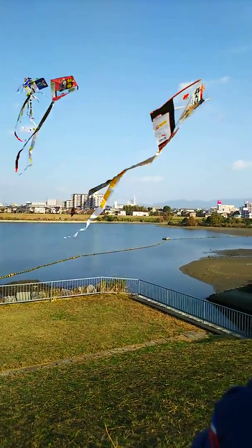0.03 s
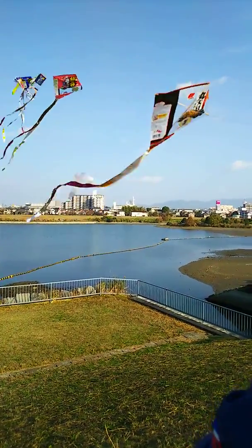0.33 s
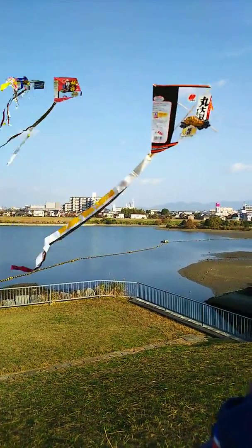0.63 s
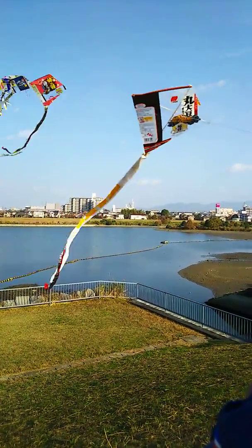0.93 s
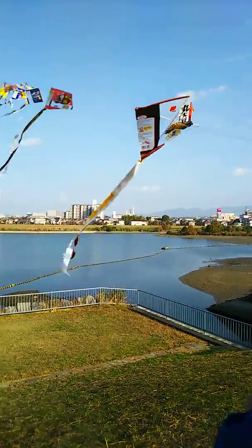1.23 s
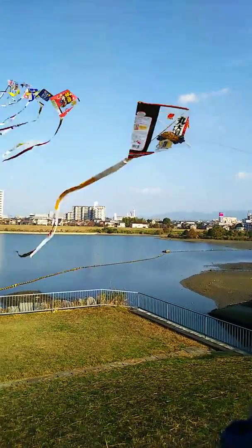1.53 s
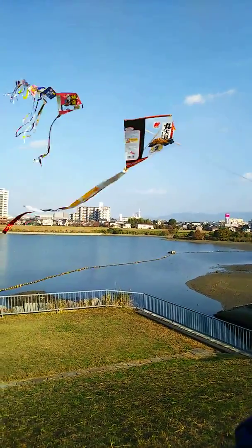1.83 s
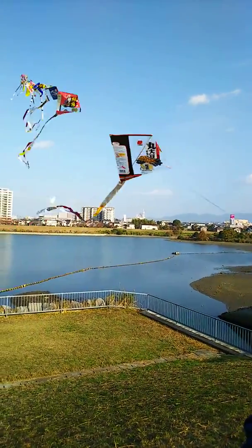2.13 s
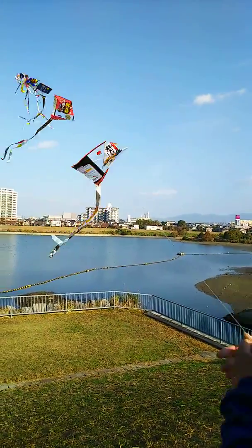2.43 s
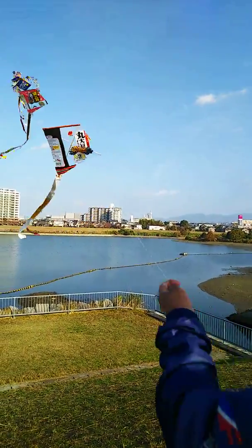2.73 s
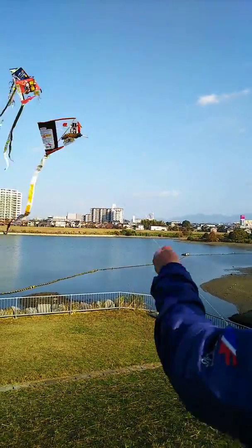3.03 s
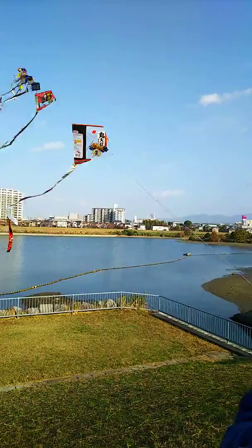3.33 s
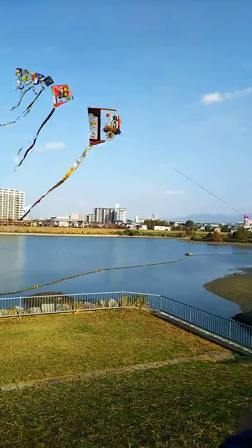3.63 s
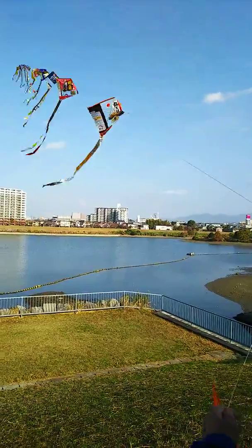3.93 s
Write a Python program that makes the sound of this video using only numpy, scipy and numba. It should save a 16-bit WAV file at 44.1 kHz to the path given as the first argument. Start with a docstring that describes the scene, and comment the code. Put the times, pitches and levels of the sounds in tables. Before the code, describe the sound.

Plastic kite tails flutter, crackle and snap a few metres away outdoors. Wind rumbles and thumps on the microphone, mostly on the left, over a faint town hum. Near the end, a jacket sleeve swishes close by.

```python
"""On the bank of a pond, plastic kites fly a few metres away. Their tails flutter in the airflow: the
buckling film crackles all the time, rustles in flurries and snaps when a wave whips off the end.
Turbulent wind buffets the two microphone ports, mostly the left, over the hum of a distant town.
Late on the breeze freshens, and a jacket sleeve swishes by friction as an arm comes down."""
import sys
import numpy as np
from scipy import signal
from scipy.fft import rfft, irfft
from scipy.io import wavfile
from scipy.ndimage import map_coordinates
from numba import njit

SR = 44100
rng = np.random.default_rng(int(sys.argv[2]) if len(sys.argv) > 2 else 0)


def unload_audio(sound):
    """Save the sound as a 16-bit wav file, at the path given as the first command line argument."""
    columns = np.transpose(np.atleast_2d(sound))
    # keep every value between -1 and 1, then stretch to whole-number steps
    steps = np.round(np.clip(columns, -1, 1) * 32767)
    wavfile.write(sys.argv[1], SR, steps.astype(np.int16))


N = 176400
TOP_HZ, EDDY_HZ = 14400, 27.816  # upper band limit; rate at which the wind's level wanders

# sound of the film at the right port, relative to the left (frequency [Hz], gain [dB])
FILM_AT_RIGHT = [(1000, 6.5), (3800, 0), (5800, -13.5), (7800, -6.5), (9300, -14), (14000, -9.5)]


def undb(db):
    """Amplitude ratio of a level in decibels."""
    return 10 ** (np.asarray(db) / 20)


def times():
    """Time of each sample in seconds."""
    return np.arange(N) / SR


def curve(rows, column=1):
    """Linear interpolation of one column of a table over time."""
    rows = np.array(rows)
    return np.interp(times(), rows[:, 0], rows[:, column])


def over_bins(points):
    """Interpolation of (frequency [Hz], value) points over the spectrum, on a log axis."""
    hz, value = np.array(points).T
    return np.interp(np.log(np.arange(N // 2 + 1) * SR / N + 1), np.log(hz), value)


def colour(x, points, right=None):
    """Spectral shaping that keeps the power of white noise, then an optional right-port filter."""
    gain = undb(over_bins(points))
    gain = gain / np.sqrt(np.mean(gain ** 2))
    if right is not None:
        gain = np.array([gain, gain * undb(over_bins(right))])
    return irfft(rfft(x) * gain, N)


def unit(x):
    """Normalisation to rms 1."""
    return x / np.sqrt(np.mean(x ** 2))


def walk(hz):
    """Smooth random modulation of rms 1, through hz new values a second."""
    return unit(map_coordinates(rng.standard_normal(4096), [times() * hz], order=3, mode="mirror"))


def swell(centre, length):
    """Gaussian envelope of peak 1."""
    return np.exp(-2 * ((times() - centre) / length) ** 2)


@njit
def damped_tones(starts, phase_steps, amplitudes, fade, count):
    """Superposition of damped sinusoids, each count samples long."""
    out = np.zeros(N + count)
    for k in range(len(starts)):
        phasor, step = amplitudes[k], fade * np.exp(1j * phase_steps[k])
        for i in range(starts[k], starts[k] + count):
            out[i] += phasor.imag
            phasor *= step
    return out[:N]


def grains(per_s=11000, ring_s=0.00038, spread_db=1):
    """Free vibration of film or cloth: dense tiny rings of random pitch, with a phase for each port."""
    when, pitch, size, left, right = rng.random((int(per_s * N / SR), 5)).T
    sizes = undb(-spread_db * np.log(np.maximum(size, np.exp(-3))))
    starts = (when * N).astype(np.int64)
    phase_steps = 2 * np.pi * pitch * TOP_HZ / SR
    fade = np.exp(-1 / (ring_s * SR))
    ports = [damped_tones(starts, phase_steps, sizes * np.exp(2j * np.pi * phase), fade, count=100)
             for phase in (left, right)]
    return unit(np.array(ports)) * np.sqrt(2 * TOP_HZ / SR)


def crackle(per_s, spread_db, decay_s=0.001):
    """Buckling as a Poisson process: creases pop at random, each a brief cluster of grains."""
    pops = (rng.random(N) < per_s / SR) * undb(spread_db * np.clip(rng.standard_normal(N), -2, 2.5))
    power = signal.lfilter([1], [1, -np.exp(-2 / (decay_s * SR))], pops ** 2)
    return unit(np.sqrt(power)) * grains()


def fluttering_tails(flap_hz=30.22, flap_depth_db=1.97):
    """Aeroelastic flutter: the film's crackle pulses with irregular flaps and swells in flurries."""
    # steady flutter (time [s], relative level [dB])
    flutter = [(0.0, -54.5), (0.81, -54.5), (1.41, -53.5), (1.49, -49.5), (1.98, -55.5), (2.16, -49.5),
               (2.39, -46.5), (2.73, -46), (3.1, -45), (3.46, -47), (3.78, -46), (4.0, -38.5)]
    # flurries of the tails (centre time [s], length [s], level [dB])
    flurries = [(0.09, 0.027, -41), (0.207, 0.016, -38.5), (0.628, 0.15, -47), (1.063, 0.04, -41.5),
                (1.413, 0.038, -44), (1.638, 0.089, -44.5), (1.838, 0.028, -45), (1.894, 0.051, -45),
                (1.936, 0.018, -40), (2.397, 0.08, -41), (2.91, 0.08, -45), (3.284, 0.041, -42),
                (3.472, 0.047, -42), (3.88, 0.025, -40), (3.994, 0.05, -38.5)]
    # spectrum of the plastic film (frequency [Hz], relative level [dB])
    film_spectrum = [(400, -11), (1200, -5), (2500, -7), (4000, -1), (5500, -3), (7200, 0.5), (8900, 4),
                     (9500, -1.5), (10000, -20.5), (11000, -9), (14300, -17)]
    steady_power = undb(curve(flutter) + 0.5) ** 2
    flurry_power = sum((undb(db) * swell(s, length)) ** 2 for s, length, db in flurries)
    flaps = unit(undb(flap_depth_db * walk(2 * flap_hz)))
    envelope = np.sqrt(steady_power + flurry_power) * flaps
    return colour(envelope * crackle(per_s=3900, spread_db=-1.5), film_spectrum, FILM_AT_RIGHT)


def wind_rumble(eddy_db=2):
    """Turbulent pressure fluctuation: eddies pass each port independently."""
    # wind between buffets (time [s], left relative level [dB], right relative level [dB])
    wind = [(0, -28.5, -40), (.3, -33, -43.5), (.55, -25.5, -32), (.65, -35, -39), (1.25, -25, -37.5),
            (1.47, -22.5, -31.5), (1.62, -30, -32.5), (2.15, -21.5, -29), (2.5, -26.5, -31.5),
            (3, -27.5, -31), (4, -24.5, -25)]
    # spectrum of the turbulence (frequency [Hz], relative level [dB])
    spectrum = [(20, -52), (31, -37), (48, -8.5), (70, -2), (100, -1), (160, -8), (240, -14.5), (400, -30),
                (800, -56), (2000, -84)]
    envelopes = np.array([undb(curve(wind, column=port) + eddy_db * walk(EDDY_HZ)) for port in (1, 2)])
    return colour(envelopes * rng.standard_normal((2, N)), spectrum) * undb(0.5)


def town_hum(level_db=-46):
    """Partial coherence: an even, far hum, most alike at the two ports in the midrange."""
    # distant town and wind in the grass (frequency [Hz], relative level [dB])
    spectrum = [(25, -18), (70, -2), (250, 0), (600, 0.1), (1000, -2), (1500, -5), (2300, -12), (4000, -14),
                (6000, -19), (8700, -17), (10000, -29), (14000, -32.5)]
    # likeness of the two ports (frequency [Hz], correlation [0-1])
    likeness = [(100, 0.28), (600, 0.91), (1400, 0.62), (3000, 0.29), (6000, .03)]
    correlation = np.clip(over_bins(likeness), 0, 1)
    mid, side = rfft(rng.standard_normal((2, N)))
    mid *= np.sqrt((1 + correlation) / 2)
    side *= np.sqrt((1 - correlation) / 2)
    ports = irfft(np.array([mid + side, mid - side]), N)
    return colour(ports, spectrum) * undb(level_db + 0.12 * walk(4.2))


def wind_buffets(low_hz=60.5, slope=4.43, reach=1.76):
    """Pressure pulses: each strong eddy thumps the ports with a compact swell of a few uneven cycles."""
    # eddies (centre time [s], length [s], level [dB], swirl's upper edge [Hz], left minus right [dB])
    buffets = [(0.034, 0.046, -24.5, 112, 15), (0.147, 0.027, -19, 136, 8.5),
               (0.288, 0.017, -14.5, 170, 17), (0.349, 0.0077, -15.5, 160, 29),
               (0.481, 0.014, -18, 235, 30), (0.501, 0.013, -18, 215, 28), (0.555, 0.013, -22.5, 166, 8),
               (0.731, 0.051, -25, 114, 8), (0.873, 0.023, -20.5, 160, 14), (0.918, 0.031, -17.5, 155, 15),
               (0.952, 0.02, -10.5, 225, 26), (1.021, 0.009, -18.5, 195, -11.5),
               (1.138, 0.05, -21.5, 230, 20), (1.35, 0.018, -17, 177, 16), (1.473, 0.025, -17.5, 175, 1.5),
               (1.531, 0.0096, -15, 220, 20), (1.734, 0.052, -17.5, 213, 27),
               (1.789, 0.038, -16.5, 190, 22), (1.836, 0.02, -10.5, 225, 32), (1.906, 0.022, -16, 172, -4),
               (2.038, 0.035, -14, 159, 7.5), (2.11, 0.022, -17, 185, 4), (2.146, 0.014, -13.5, 192, 10),
               (2.174, 0.014, -11, 170, 20), (2.269, 0.022, -22, 345, 13), (2.37, 0.041, -20, 170, 8),
               (2.583, 0.019, -17.5, 171, 12), (2.64, 0.012, -21.5, 190, 17), (2.771, 0.013, -18.5, 214, 4),
               (2.891, 0.049, -20.5, 204, 17), (3.063, 0.016, -20, 130, 15), (3.115, 0.024, -19.5, 220, 24),
               (3.181, 0.049, -20, 189, 7.5), (3.407, 0.022, -17.5, 150, 11), (3.465, 0.029, -19, 200, 7),
               (3.563, 0.047, -15.5, 225, 15), (3.634, 0.01, -16.5, 170, 12), (3.72, 0.021, -10, 198, 21),
               (3.813, 0.02, -12.5, 209, 10), (3.872, 0.01, -16, 140, 6), (3.922, 0.0063, -15, 193, 3),
               (3.963, 0.016, -14, 245, 12)]
    out, size = np.zeros((2, N + SR)), SR // 2
    hz = np.arange(size // 2 + 1) * SR / size
    lag = (np.arange(size) - size // 2) / SR
    low_cut = 1 - np.exp(-(hz / low_hz) ** 5)
    for s, length, db, edge_hz, pan_db in buffets:
        swirl_band = low_cut / (1 + (hz / edge_hz) ** slope)
        swirl = signal.hilbert(irfft(rfft(rng.standard_normal((2, size))) * swirl_band, size))
        # the swirl gives only its phase; a bell sets the amplitude
        thump = np.cos(np.angle(swirl)) * np.exp(-2 * (lag / length) ** 2)
        thump_band = low_cut / (1 + (hz / (reach * edge_hz)) ** slope)
        pressure = irfft(rfft(thump) * thump_band, size)
        pressure /= np.sqrt(np.sum(pressure ** 2, axis=1, keepdims=True) / (length * SR))
        sides = undb(np.array([[pan_db], [-pan_db]]) / 2)
        out[:, int(s * SR):int(s * SR) + size] += undb(db) * pressure * sides / np.linalg.norm(sides)
    return out[:, size // 2:size // 2 + N]


def snapping_tails(attack_s=0.0007, decay_s=0.0043, shiver_s=0.0098, shiver_db=-16, split_hz=7800):
    """Impulsive radiation: the film whips taut with a sharp crack, then a faint shiver."""
    # snaps of the tails (time [s], relative level [dB], upper band over lower band [dB])
    snaps = [(0.0464, -44, 7), (0.1036, -34, -1), (0.532, -33, 6), (0.5398, -37, 7), (0.596, -26.5, 4),
             (0.632, -36.5, 10), (1.072, -37.5, 7), (1.136, -37.5, 8), (1.332, -33.5, 11),
             (1.345, -45, -4.1), (1.3658, -41.5, 10), (1.3893, -36, 9), (1.6985, -45, 9), (1.8205, -38, 15),
             (1.8863, -33.5, 4), (2.019, -35, 20), (2.16, -45, -9), (2.221, -39.5, 13), (2.37, -36, 14),
             (2.4862, -38.5, 2), (2.573, -42.5, -19), (2.6445, -35, 6.5), (2.724, -49, -19),
             (2.883, -39, -6), (3.028, -39, 4), (3.0694, -29.5, 4.5), (3.1575, -33, -1), (3.237, -42, -13),
             (3.302, -35, 3), (3.3695, -38.5, -3), (3.492, -39, 6), (3.855, -39, 8)]
    # spectrum of a snap, brighter than the steady crackle (frequency [Hz], relative level [dB])
    spectrum = [(400, -12), (1200, -7), (2500, -8.5), (4000, 1.5), (5500, 0.5), (7200, 2.5), (8900, 6.5),
                (9500, -0.5), (10000, -11), (11000, -10), (14300, -14)]
    age = times()[:SR // 10]
    crack = np.exp(-(age / decay_s) ** 2)
    shiver = undb(shiver_db) * np.exp(-age / shiver_s)
    shape = (1 - np.exp(-age / attack_s)) * (crack + shiver)
    envelopes = np.zeros((2, N))  # below and above split_hz
    for s, db, bright_db in snaps:
        band_gains = undb(db + 3.5) * unit(undb([[0], [bright_db]]))
        span = envelopes[:, int(s * SR):][:, :len(age)]
        span += band_gains * shape[:span.shape[1]] / shape.max()
    ringing = grains()
    upper = signal.sosfiltfilt(signal.butter(3, split_hz, "high", fs=SR, output="sos"), ringing)
    return colour(envelopes[0] * (ringing - upper) + envelopes[1] * upper, spectrum, FILM_AT_RIGHT)


def breeze(eddy_db=2):
    """Flow noise: a soft rush past the phone that grows as the wind freshens."""
    # strength of the rush (time [s], level [dB])
    rush = [(0, -80), (1.9, -60), (2.8, -49), (4, -45)]
    # spectrum of the rush (frequency [Hz], relative level [dB])
    spectrum = [(150, -22), (330, 8.5), (480, -1), (750, -5.5), (1500, -36), (6000, -43)]
    return colour(rng.standard_normal((2, N)) * undb(curve(rush) + eddy_db * walk(EDDY_HZ)), spectrum)


def sleeve_swishes(attack_s=0.0028):
    """Friction noise: jacket cloth rubs on itself close to the microphone."""
    # strokes of the sleeve (start time [s], decay time [s], level [dB], spectral tilt [dB/octave])
    swishes = [(3.159, 0.021, -32, 0), (3.179, 0.18, -43.5, -1.5), (3.43, 0.11, -44, 7),
               (3.568, 0.051, -33.5, 6), (3.61, 0.17, -36.5, 10), (3.945, .12, -39, 11)]
    # spectrum of the cloth (frequency [Hz], relative level [dB])
    cloth = [(400, 5), (1300, -4), (2500, -2.5), (4000, 5), (5500, -4), (7000, -1.5), (8300, 2.5),
             (9300, 0), (10100, -20), (12000, -14), (14300, -26)]
    # sound of the cloth at the right port, relative to the left (frequency [Hz], gain [dB])
    cloth_at_right = [(1000, 9), (4000, 1.5), (5900, -16), (7900, 0.5), (9500, -6.5), (14000, -5)]
    out = 0
    for s, decay_s, db, tilt_db in swishes:
        age = np.maximum(times() - s, 0)
        shape = np.minimum(age / attack_s, 1) * np.exp(-np.maximum(age - attack_s, 0) / decay_s)
        tilted = [(hz, level + tilt_db * np.log2(hz / cloth[0][0])) for hz, level in cloth]
        out = out + colour(undb(db) * shape * crackle(per_s=750, spread_db=0.5), tilted, cloth_at_right)
    return out


def sleeve_crease(level_db=-22):
    """Snap-through buckling: the cloth folds with one bright tick, equally near both ports."""
    # spectrum of the tick (frequency [Hz], relative level [dB])
    spectrum = [(2000, -22), (6000, -19), (7300, -13), (8100, 9), (9000, -7), (10000, -26), (14000, -13)]
    tick = colour(rng.standard_normal((2, N)), spectrum)
    return undb(level_db) * swell(centre=3.5876, length=0.0012) * tick


def scene():
    """Superposition: the pressures of kites, wind, town and sleeve add at each port."""
    return (fluttering_tails() + wind_rumble() + town_hum() + wind_buffets() + snapping_tails()
            + breeze() + sleeve_swishes() + sleeve_crease())


def record(dry):
    """Band limiting: the phone's steep low-pass filter cuts the top of the treble."""
    return signal.sosfilt(signal.ellip(10, .2, 80, TOP_HZ, fs=SR, output="sos"), dry)


dry = scene()
out = record(dry)
unload_audio(out)
```